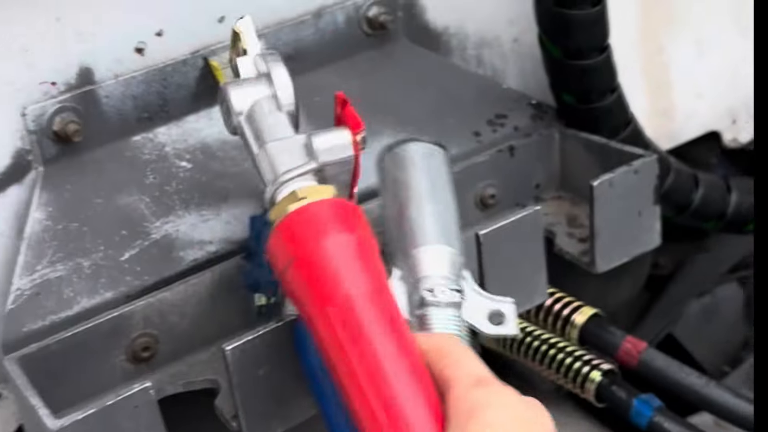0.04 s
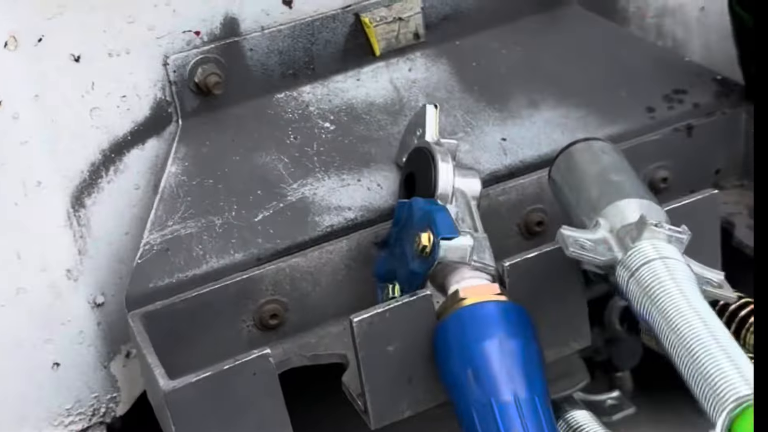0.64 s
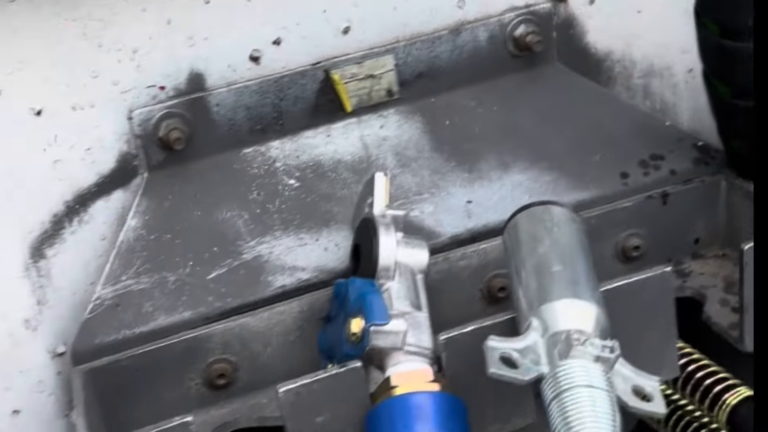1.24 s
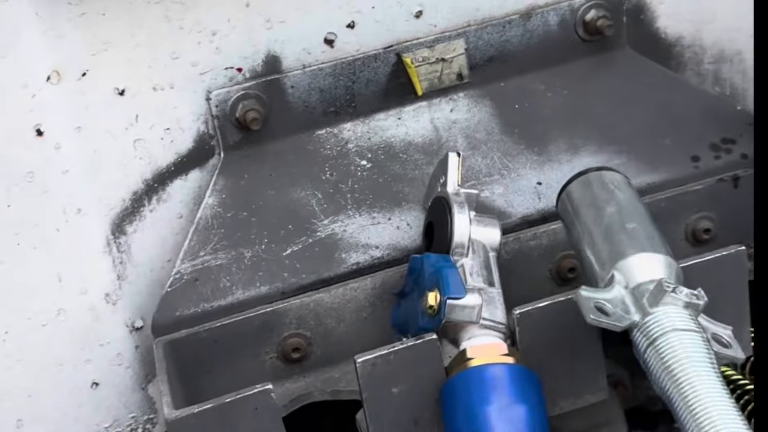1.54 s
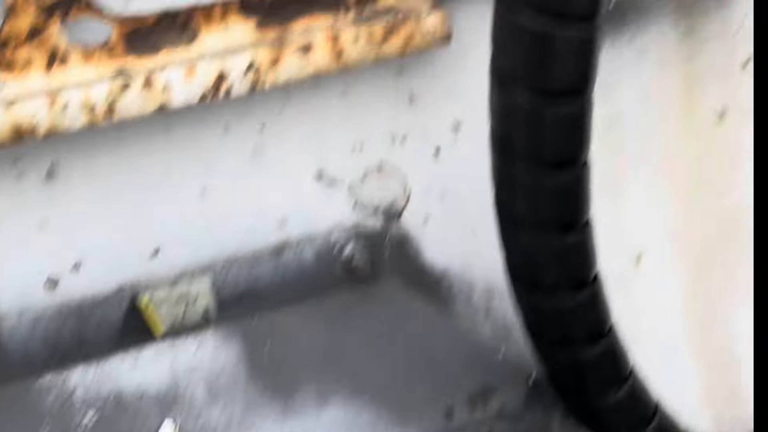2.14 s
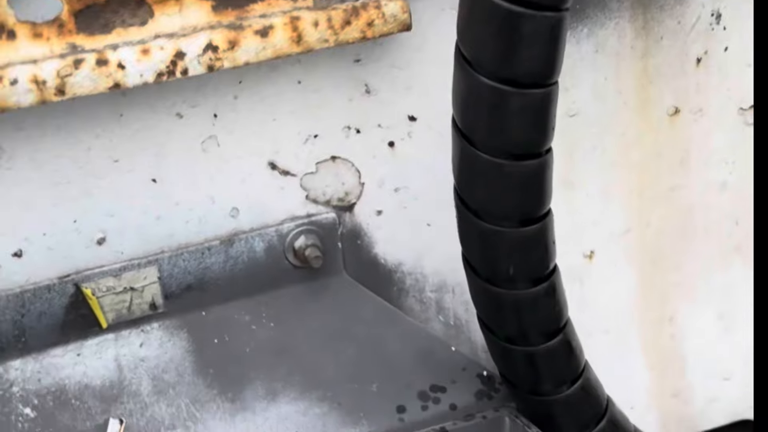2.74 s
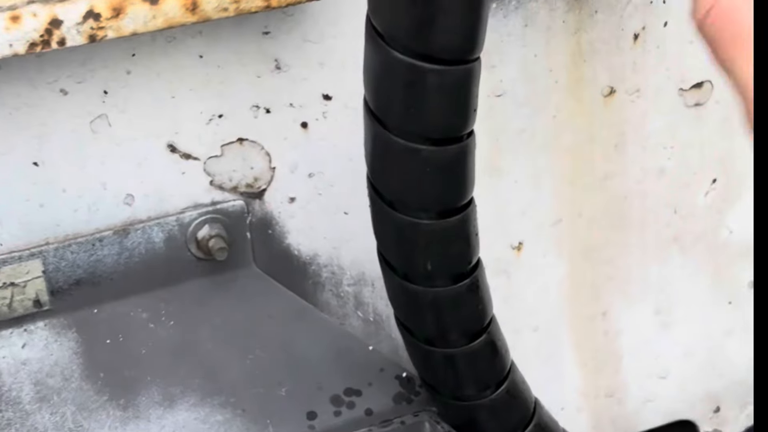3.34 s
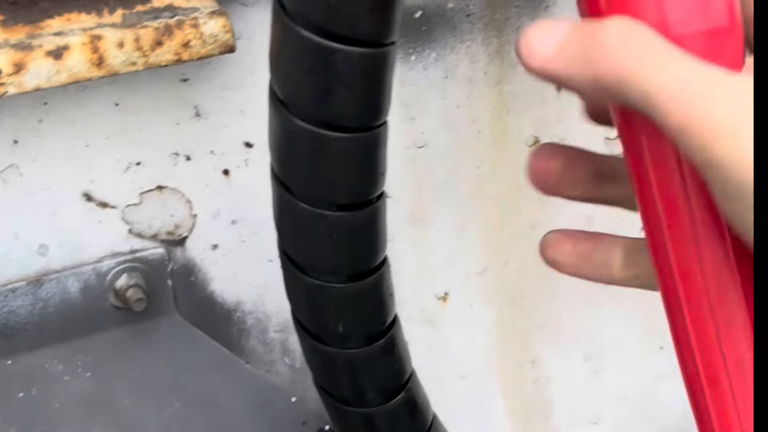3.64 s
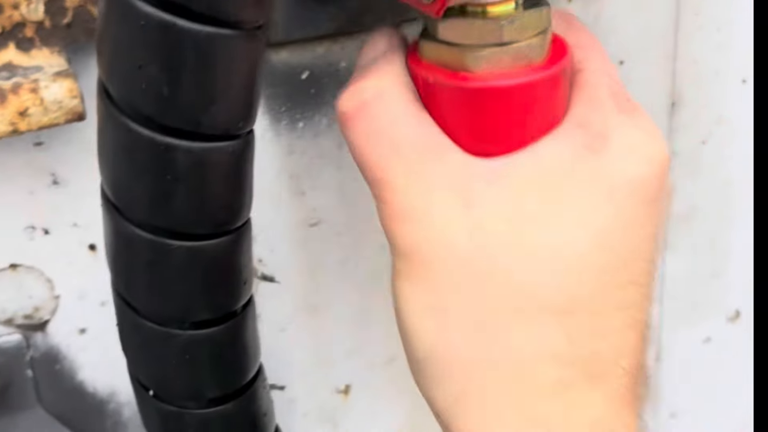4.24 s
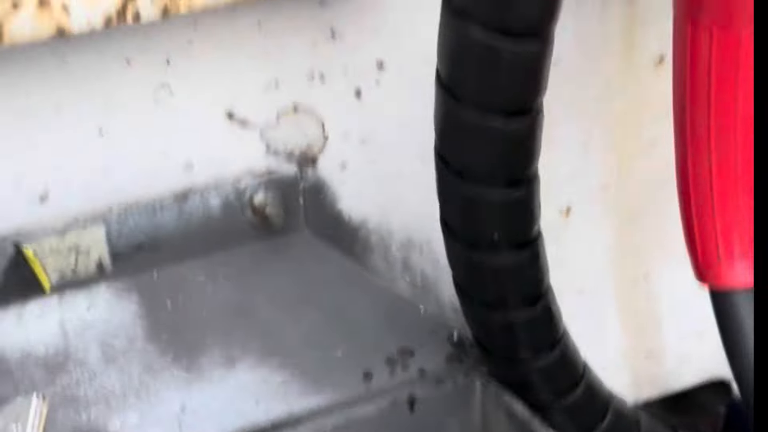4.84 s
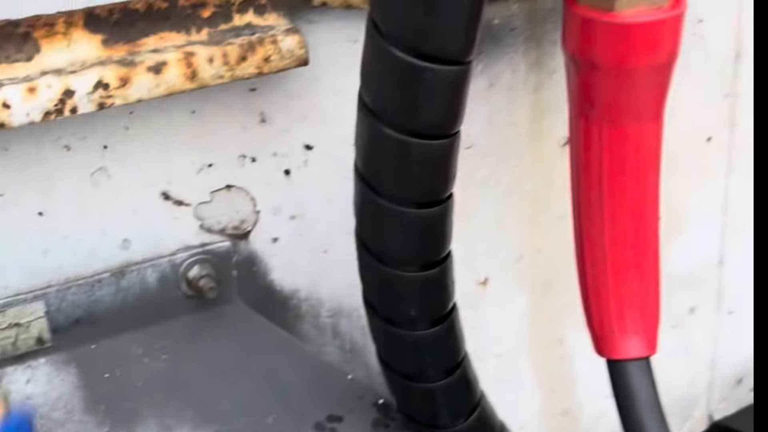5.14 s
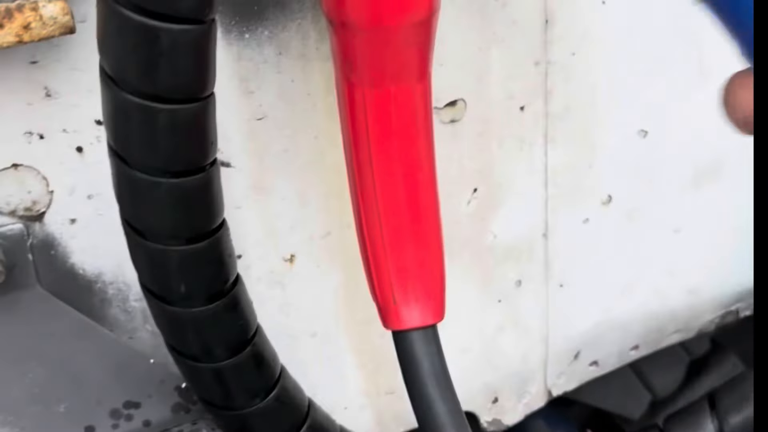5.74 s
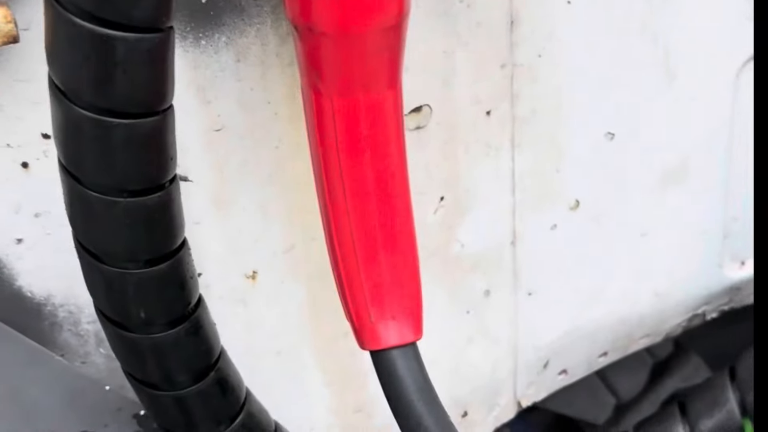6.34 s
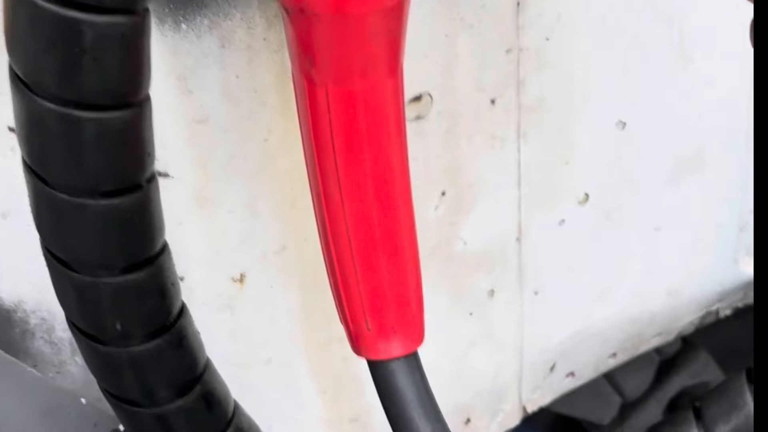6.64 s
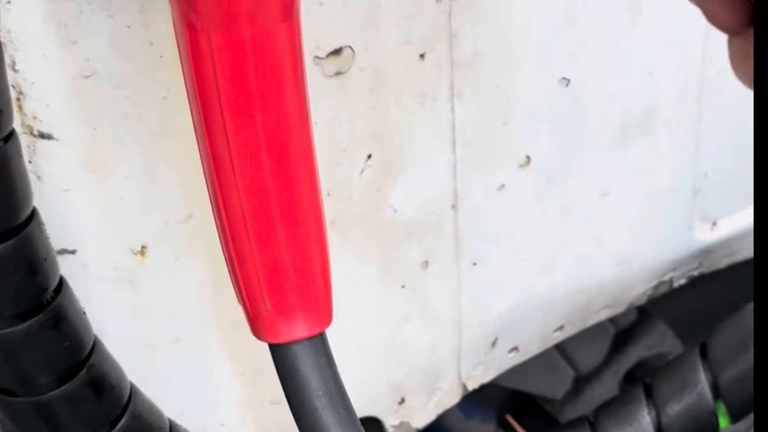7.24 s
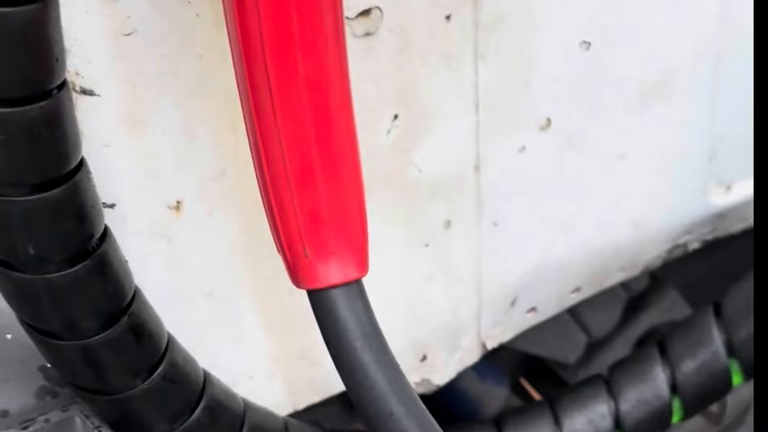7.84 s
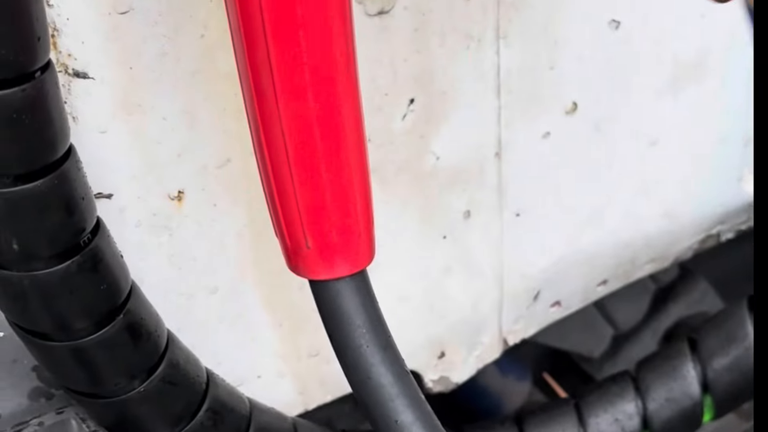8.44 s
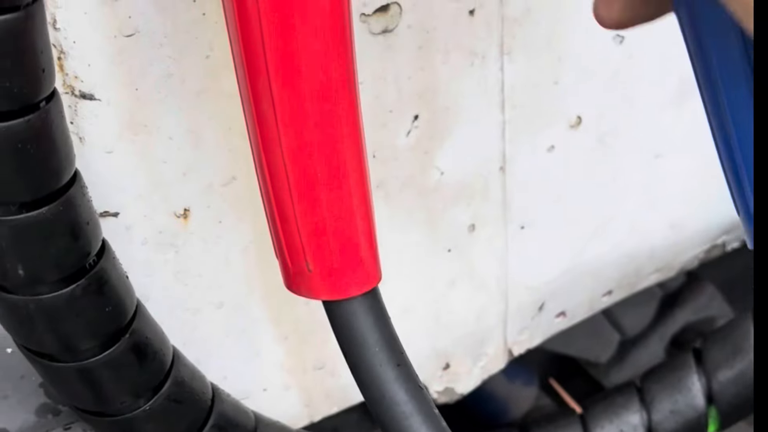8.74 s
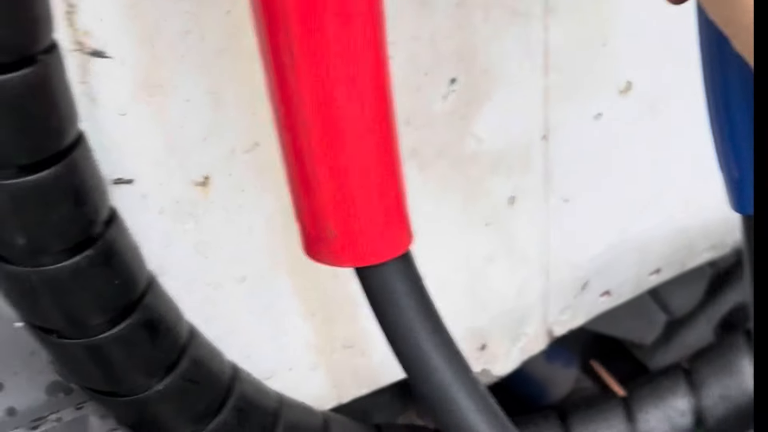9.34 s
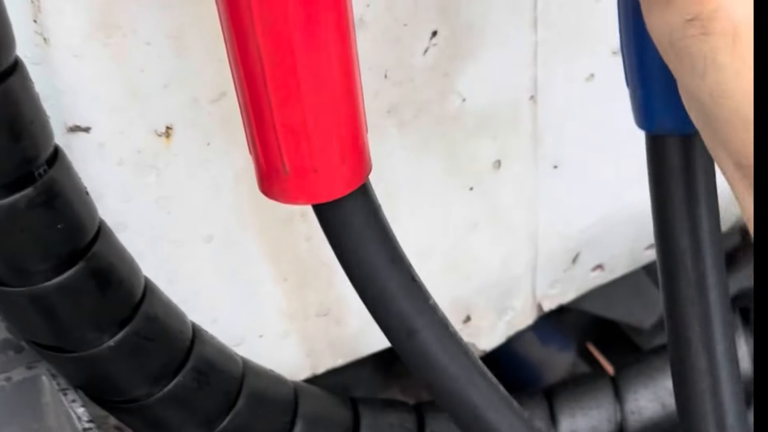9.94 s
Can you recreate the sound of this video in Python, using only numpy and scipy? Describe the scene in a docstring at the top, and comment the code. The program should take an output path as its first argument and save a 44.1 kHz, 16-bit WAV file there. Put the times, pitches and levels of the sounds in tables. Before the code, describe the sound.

Air hose couplings are handled close up behind a truck's cab, over the steady low drone of a distant idling engine. In the first half second, the metal heads come off a steel bracket with three sharp, briefly ringing clanks. Soft bumps and a small scrape follow. Around 2.3 seconds comes a loud cluster of knocks that thump through sheet steel, then two hollow ringing hits by 2.8. Short scrapes and more knocks run from 3.3 to 4.3 seconds. At 5 seconds there are low thuds with a faint springy ring, and firm clanks land at about 5.8 and 6. From 6.4 to 8.4 seconds, lighter knocks, ticks and scrapes come in a busy, uneven run. Strong hollow knocks fall at about 9, 9.3 and 9.8 seconds. Between the blows, hoses rub softly and sleeves rustle with a faint dry crackle.

```python
"""Behind a truck's cab, close up: air hose couplings are lifted off a steel bracket and hung up.
Their metal heads clank, knock and scrape; each blow thumps through the sheet steel, and the cleanest
leave parts ringing. Blows are noise bursts coloured by the steel, rings are decaying sines, and scrapes
are noise roughened by tiny slips. Hoses rub and sleeves rustle in between, over a low engine idle."""
import sys
import numpy as np
from scipy import signal
from scipy.fft import rfft, irfft, next_fast_len
from scipy.io import wavfile
from scipy.ndimage import uniform_filter1d, map_coordinates

SR = 44100
rng = np.random.default_rng(int(sys.argv[2]) if len(sys.argv) > 2 else 0)


def dump(signal):
    """Clip the signal to [-1, 1] and save it as 16-bit WAV at the path in sys.argv[1]."""
    limited = np.clip(np.atleast_2d(signal).T, -1, 1)
    pcm = np.round(limited * 32767).astype(np.int16)
    wavfile.write(sys.argv[1], SR, pcm)


N = 440118
BLOW_SAMPLES = 10240
GRAZE_S = 0.014  # the metal grazes its seat this long before it strikes home

# tone of a metal contact, with the recorder's notch near 12 kHz: (frequency [Hz], level [dB])
CONTACT_EQ = [(60, -2.5), (150, 6), (450, 3), (1200, 1), (2000, -7), (3000, -13.5), (4200, -21),
              (7000, -20), (9500, -29.5), (12000, -55), (15500, -27.5)]
# tone of rubbing hose and coupling body: (frequency [Hz], level [dB])
RUB_EQ = [(70, -20), (200, 2.5), (450, 6), (850, -1.5), (1500, -14), (2300, -14), (4000, -27), (9000, -61)]


def knocks():
    """Each contact ticks and clanks in the coupling head, knocks the bracket and thumps the panel."""
    hz = np.fft.rfftfreq(BLOW_SAMPLES, 1 / SR)
    body = steel(hz) * amp(along(CONTACT_EQ, hz))
    panel = causal(body * band(hz, 43, 136.6))
    plate = causal(body * band(hz, 169, 1092))
    casting = causal(body * band(hz, 1320, 3080, order=6))
    edge = causal(body * band(hz, 3900, 15000))
    track = np.zeros((2, N))
    for s, thump_db, knock_db, knock_hz, clank_db, clank_hz, tick_db, sustain in contacts():
        spot = amp(contact_point(depth_db=5.5) * band(hz, 700, SR, order=1))
        # bracket and head each get a broad hump with one mode standing out
        bracket = plate * spot * resonance(hz, knock_hz, q=0.74)
        bracket *= 1 + 1.5 * resonance(hz, knock_hz, q=21.3)
        head = casting * spot * resonance(hz, clank_hz, q=0.17)
        head *= 1 + 1.02 * resonance(hz, clank_hz, q=14.5)
        cutoff_hz = 3940 * amp(0.58 * (clank_db - knock_db))  # a cushioned blow is duller
        bracket *= band(hz, 1, cutoff_hz, order=3)
        rise_s = 0.00066 * (0.5 + np.clip((-11.5 - knock_db) / 7, 0, 3))  # gentle blows bite slowly
        thump = burst(panel, rise_s=0.0021, t60=0.1,
                      tail_db=-12.5, tail_t60=0.36, graze_db=-14.5, side_db=-39)
        knock = burst(bracket, rise_s, t60=0.12 * sustain,
                      tail_db=-24.5, tail_t60=0.38, graze_db=-16, side_db=-16.5)
        clank = burst(head, rise_s, t60=0.068 * sustain,
                      tail_db=-14, tail_t60=0.16, graze_db=-13, side_db=-16)
        tick = burst(edge * spot, rise_s=0.00033, t60=0.033,
                     tail_db=-13, tail_t60=0.17, graze_db=-33, side_db=-4.5)
        lows = amp(thump_db - 1.5) * thump + amp(knock_db + 0.59) * knock
        highs = amp(clank_db + 0.3) * clank + amp(tick_db) * tick
        add(track, s - GRAZE_S, lows + highs)
    return track


def contacts():
    """Time, levels and tuning of every blow and, unless it is held fast, of its lower, duller rebound."""
    # coupling blows; weight (thump), hardness (clank) and rebound are relative to the level:
    # (time [s], level [dB], pitch [Hz], weight [dB], hardness [dB], rebound [dB])
    blows = [(0.002, -30, 507, 13, -10.5, -1.5), (0.081, -17, 865, -2, -6, -6),
             (0.138, -35.5, 513, 16.5, -4, -22), (0.166, -17, 718, -1, -2.5, -9),
             (0.473, -19.5, 1110, -21, -7.5, -19), (0.753, -33, 390, 7.5, -14.5, -46),
             (0.784, -32.5, 770, 2, -19, -18), (1.099, -37.5, 246, -2, -25, -24),
             (1.156, -33.5, 284, -1, -15, -13), (1.454, -42.5, 405, 2, 1.5, 2),
             (1.694, -41, 233, -3, -6.5, -28), (1.99, -42, 484, -11, -11.5, 0.5),
             (2.272, -22, 407, -30, -7.5, -2), (2.297, -23, 476, -10, -11, -4.5),
             (2.313, -13, 258, -4.5, -16.5, -18), (2.331, -17, 557, -11, -20.5, -24.5),
             (2.467, -22, 670, -10, -16, -0.5), (2.768, -20.5, 332, -10, -12, -4.5),
             (2.976, -31.5, 454, -3, -26, -31.5), (3.326, -25.5, 460, -5, -16, -4.5),
             (3.361, -20, 517, -3, -12.5, -13.5), (3.4, -28, 430, 0, -12, -7),
             (3.48, -27.5, 850, -11, -20, -39), (3.865, -47.5, 506, -21, 4, -18),
             (3.992, -25, 217, -10, -21, -4.5), (4.242, -18.5, 550, -16, -21.5, -9.5),
             (4.269, -20, 227, -29, -22.5, -15), (4.903, -36.5, 438, 10.5, -15, -18),
             (4.95, -37.5, 457, 10, -25, -22), (4.984, -34, 640, 15.5, -9.5, -11),
             (5.004, -31.5, 950, 5, -6, -12), (5.441, -54.5, 690, -10, -1, -25),
             (5.786, -18.5, 1007, -4, -2.5, -18.5), (5.802, -18, 268, -8.5, -15, -16.5),
             (6.049, -17, 757, -26, -14.5, -19), (6.176, -35.5, 457, -25, -17, -14),
             (6.339, -30, 620, -25, -16, -19), (6.458, -25, 488, -6.5, -20, -13.5),
             (6.535, -39, 630, -1, -12, -17), (6.646, -30.5, 607, -6, -22, -2),
             (6.675, -31.5, 406, 6.5, -27, -18), (6.728, -32, 660, -2.5, -11.5, -19),
             (6.826, -28, 308, -24, -13, -5.5), (6.845, -30.5, 706, -14, -20, -19),
             (6.906, -25.5, 645, -21, -22, -17), (7.136, -20.5, 410, -5, -10, -7.5),
             (7.305, -35.5, 450, -2, -20, -4), (7.41, -32.5, 497, -11, -17.5, -29),
             (7.483, -24.5, 387, -2.5, -11, -9.5), (7.536, -23, 447, 1, -10.5, -5.5),
             (7.626, -32, 484, -6, -16, -6.5), (7.914, -31, 620, -5.5, -18.5, -10),
             (8.017, -27, 485, -17, -8.5, -13.5), (8.059, -21.5, 663, -5, -13, -5.5),
             (8.268, -32.5, 477, -10, -8, -0.5), (9.038, -13, 388, -12, -10.5, -10.5),
             (9.293, -15, 410, -7, -8, -3), (9.54, -30.5, 460, -10, -25.5, -19),
             (9.653, -23.5, 422, -2.5, -30, -12), (9.786, -17.5, 478, -3, -31.5, -11)]
    for s, db, pitch_hz, weight_db, hard_db, rebound_db in blows:
        freedom = amp(0.28 * (rebound_db + 6.5))  # a hand that stops the rebound also damps the ring
        landings = [(s, db, pitch_hz, 0)]
        if rebound_db >= -17.5:
            landings.append((s + 0.021, db + rebound_db, 0.75 * pitch_hz, -5))
        for when, knock_db, knock_hz, bright_db in landings:
            pitch_ratio = knock_hz / 500  # a higher knock clanks higher and dies sooner
            clank_hz = 1766 * pitch_ratio ** 0.4 * np.exp(0.077 * rng.standard_normal())
            sustain = 0.94 * freedom / pitch_ratio ** 0.1
            clank_db = knock_db + hard_db + bright_db
            tick_db = knock_db - 27.5 + bright_db
            yield when, knock_db + weight_db, knock_db, knock_hz, clank_db, clank_hz, tick_db, sustain


def burst(response, rise_s, t60, tail_db, tail_t60, graze_db, side_db):
    """Dense vibration of a blow: graze, quick decay and faint tail; rms 1 over the 30 ms after impact."""
    t = np.arange(BLOW_SAMPLES) / SR - GRAZE_S
    after = np.maximum(t, 0)
    attack = 1 - np.exp(-(after / rise_s) ** 2)
    decay = amp(-60 * after / t60) + amp(tail_db - 60 * after / tail_t60)
    graze = amp(graze_db) * np.exp(-np.abs(t) / 0.0039)
    noise = stereo_noise(BLOW_SAMPLES, side_db) * (attack * decay + graze)
    hit = irfft(rfft(noise) * response)
    return hit / np.sqrt(np.mean(hit[:, (t > 0) & (t < 0.03)] ** 2))


def steel(hz):
    """Gain of the resonances of bracket, panel and coupling heads."""
    # steelwork modes: (centre [Hz], width [Hz], height [dB])
    modes = [(104.5, 10.1, 16), (231, 19, 7.5), (327.5, 4.6, 4.5), (437.6, 12, 8), (680, 6.6, 0),
             (828, 4.7, 0.5), (1037, 47, 6.5), (1234, 9.5, 4), (1338, 11.5, 5), (1538, 51, 0),
             (2170, 76, 8), (2510, 30, 6), (3800, 200, -2), (5500, 23, -1.5), (5710, 90, 6.5),
             (7040, 80, 4.5), (9940, 340, 9)]
    peaks = sum(amp(db) ** 2 / (1 + (2 * (hz - centre) / width) ** 2) for centre, width, db in modes)
    return np.sqrt(1 + peaks)


def contact_point(depth_db):
    """Each spot on the metal favours its own modes: a random comb of peaks and dips."""
    t = np.arange(BLOW_SAMPLES) / SR
    echoes = rng.standard_normal(BLOW_SAMPLES) * t * np.exp(-t / 0.0018)
    return rfft(echoes / np.linalg.norm(echoes)) * depth_db


def ringing():
    """Parts that ring on after a clean blow: coupling head, cable plug, hanger (and the blue coupling as it
    seats, ringing with the same modes) and a small sprung part."""
    # modes of each part: (pitch [Hz], level [dB], t60 [s])
    head_modes = [(827, -20, 0.13), (1410, -20, 0.03), (2170, -37.5, .09), (2750, -19, 0.056),
                  (4850, -24.5, 0.05), (5420, -27, 0.057), (6040, -24.5, 0.044), (7070, -35, .06),
                  (9900, -23.5, 0.042)]
    plug_modes = [(1094, -9, 0.056), (1290, -12, 0.086), (1490, -23, 0.053), (3050, -17, 0.036),
                  (3400, -19.5, 0.054), (3890, -22, 0.046)]
    hanger_modes = [(445.6, 2, .15), (544, -5, .1), (632, -2, .12), (810, -6.5, 0.24), (1069, -5, 0.079),
                    (1345, 3.5, 0.1)]
    spring_modes = [(417, -19, 0.13), (542, -23.5, 0.57), (1170, -17, 0.12), (1310, -14, 0.065),
                    (3220, -36, 0.059)]
    # the cast head is knocked as it pulls free: (time [s], level [dB])
    head_blows = [(.082, 4.5), (0.17, 3)]
    # blows that ring the hollow hanger's modes: on the hanger itself, and from 9 s the blue coupling seating
    # home: (time [s], level [dB], pitch the struck spot favours [Hz])
    hollow_blows = [(2.468, -6.5, 650), (2.769, -11, 575), (5.787, -14.5, 1450), (6.05, -11, 770),
                    (7.135, -24.5, 500), (9.04, -17.5, 385), (9.293, -10.5, 498), (9.788, -9.5, 453)]
    reach_octaves = 0.46
    track = np.zeros((2, N))
    for s, db in head_blows:
        add(track, s, amp(db) * free_ring(head_modes, attack_s=0.00038))
    add(track, 0.4745, free_ring(plug_modes, attack_s=0.0006))
    for s, db, spot_hz in hollow_blows:
        excited = [(hz, level - 10 / np.log(10) * (np.log2(hz / spot_hz) / reach_octaves) ** 2, t60)
                   for hz, level, t60 in hanger_modes]
        add(track, s, amp(db) * free_ring(excited, attack_s=0.0015))
    add(track, 5.004, free_ring(spring_modes, attack_s=0.00098))
    return track


def free_ring(modes, attack_s):
    """The modes of a struck part, each slightly unsteady and excited differently by every blow."""
    t = np.arange(SR // 2) / SR
    phases = [2 * np.pi * (hz * t + rng.random()) + 0.2 * wobble(90, len(t)) for hz, _, _ in modes]
    tone = sum(amp(db + rng.normal() - 60 * t / t60) * np.sin(phase)
               for (_, db, t60), phase in zip(modes, phases))
    return tone * (1 - np.exp(-t / attack_s))


def ticks():
    """A sharp edge catches: a flick of bright crackle that leaves the panel still."""
    # metal edges catching: (time [s], level [dB])
    catches = [(0.081, -25), (0.167, -23), (0.4742, -36), (2.141, -54), (2.466, -25.5), (2.767, -34),
               (3.398, -44.5), (3.513, -51.5), (3.324, -41), (3.964, -42), (4.269, -43), (5.102, -49.5),
               (5.28, -48.5), (6.797, -51.5), (6.826, -44), (7.136, -42.5), (7.244, -55), (7.343, -50),
               (7.41, -40.5), (7.534, -45), (8.059, -32.5), (8.084, -41), (8.111, -46.5), (8.189, -51.5),
               (8.497, -48.5), (8.942, -46), (9.037, -44), (9.291, -34.5), (9.327, -42), (9.949, -53)]
    hz = np.fft.rfftfreq(BLOW_SAMPLES, 1 / SR)
    edge = causal(steel(hz) * amp(along(CONTACT_EQ, hz)) * band(hz, 3350, 15000))
    track = np.zeros((2, N))
    for s, db in catches:
        spot = amp(contact_point(depth_db=5.5))
        tick = burst(edge * spot, rise_s=0.00079, t60=0.02,
                     tail_db=-21, tail_t60=0.12, graze_db=-35.5, side_db=-7)
        add(track, s - GRAZE_S, amp(db + 0.7) * tick)
    return track


def scrapes():
    """Dragged metal rubs and grates, each spot in its own resonance; a brushing hand only hisses."""
    # metal dragged over the bracket: (start [s], length [s], level [dB], rise [s], resonance [Hz])
    drags = [(0.021, 0.021, -38, 0.006, 820), (0.098, 0.032, -30, 0.0094, 816),
             (1.444, 0.086, -33.5, 0.01, 1230), (2.256, 0.048, -22.5, 0.015, 256),
             (2.67, 0.091, -36, 0.016, 624), (2.936, 0.028, -25.5, 0.014, 473),
             (3.305, 0.11, -28, 0.015, 880), (3.808, 0.21, -46.5, 0.019, 700),
             (3.926, 0.099, -28.5, 0.038, 706), (4.217, 0.12, -41.5, 0.0071, 345),
             (4.969, 0.047, -30, 0.015, 1320), (6.869, 0.14, -43, 0.028, 453),
             (7.284, 0.18, -48.5, 0.0095, 660), (7.514, 0.16, -43.5, 0.0049, 466),
             (8.078, 0.027, -30.5, 0.0036, 910), (8.251, 0.032, -30.5, 0.0096, 930),
             (8.404, 0.14, -40, 0.018, 880), (8.91, .037, -42.5, 0.0048, 436),
             (9.149, 0.06, -43.5, 0.0075, 450)]
    # a hand brushing a sleeve: (start [s], length [s], level [dB])
    brushes = [(0.592, 0.027, -44.5), (1.145, 0.14, -52), (1.736, 0.014, -36.5), (2.822, 0.027, -41.5),
               (3.484, 0.037, -40), (4.419, 0.054, -52), (4.759, 0.013, -40.5), (5.005, 0.03, -46),
               (5.275, 0.039, -38.5), (5.668, 0.11, -47), (5.83, 0.047, -42.5), (6.374, 0.031, -45),
               (6.447, 0.015, -41.5), (7.761, 0.014, -48.5), (7.976, 0.058, -47), (8.936, 0.025, -40),
               (9.567, 0.026, -47), (9.815, 0.027, -41.5)]
    # tone of sliding grit, with the recorder's notch near 12 kHz: (frequency [Hz], level [dB])
    grit_eq = [(600, -26.5), (1500, -6.5), (2300, 3), (4200, -1), (5800, 4), (7500, 7), (9500, 1),
               (12000, -26.5), (15500, -3)]
    rubbing = friction(RUB_EQ, slip_rate=300, slip_db=0.5, metal=0.72, patchy_db=5.5, side_db=-14.5)
    rub, grit_gain = np.zeros((2, N)), np.zeros((1, N))
    for start, length, rub_db, rise_s, peak_hz in drags:
        envelope = stroke(length, rise_s)
        slide = envelope * rubbing[:, round(start * SR):][:, :len(envelope)]
        slide = filtered(slide, lambda hz: 1 + amp(4) * resonance(hz, peak_hz, q=3.7))
        add(rub, start, amp(rub_db + 4) * slide)
        # quicker drags and harder pressure are grittier
        grit_db = -44 - 2 * np.log2(length / 0.11) + 0.58 * (rub_db + 29.5)
        add(grit_gain, start, amp(grit_db) * envelope)
    for start, length, db in brushes:
        add(grit_gain, start, amp(db) * stroke(length, rise_s=0.093 * length))
    grating = friction(grit_eq, slip_rate=1300, slip_db=1.5, metal=0.22, patchy_db=3.5, side_db=-8)
    return rub + grit_gain * snags() * grating


def stroke(length, rise_s):
    """Envelope of one slide: it builds up, eases off as it grates along and dies away."""
    t = np.arange(SR // 2) / SR
    attack = 1 - np.exp(-(t / rise_s) ** 2)
    easing = amp(-4 * np.minimum(t / length, 1))
    release = np.exp(-np.maximum(t - length, 0) / 0.02)
    return attack * easing * release


def friction(eq, slip_rate, slip_db, metal, patchy_db, side_db):
    """Tiny irregular slips shake the steelwork, their colour shifting as the contact moves; rms 1."""
    slips = stereo_noise(N, side_db) * amp(slip_db * wobble(slip_rate))
    spectra = signal.stft(slips, nperseg=512)[2]
    patches = uniform_filter1d(rng.standard_normal(spectra.shape[1:]), size=4, axis=0)  # across pitch
    patches = uniform_filter1d(patches, size=14, axis=1)  # across time
    slips = signal.istft(spectra * amp(patchy_db * unit(patches)), nperseg=512)[1][:, :N]
    return unit(filtered(slips, lambda hz: amp(along(eq, hz)) * steel(hz) ** metal))


def snags():
    """Gain of a sliding contact that catches now and then."""
    return bumps(rate=32, height_db=3.5, decay_s=0.0033)


def squeaks():
    """A rubber fitting slips for a moment and rasps in one resonance."""
    # rubber slips: (time [s], level [dB])
    slips = [(2.616, -42), (2.672, -42.5), (2.715, -43), (7.038, -45.5)]
    t = np.arange(N) / SR
    envelope = sum(amp(db) * np.exp(-((t - s) / 0.0071) ** 2) for s, db in slips)
    rasp = filtered(rng.standard_normal(N), lambda hz: resonance(hz, 2180, q=6.8) ** 2)
    return envelope * unit(rasp)


def grip():
    """Skin sliding down the ribbed plastic grip snags and hisses in two resonances."""
    # hand slides: (middle [s], half length [s], level [dB])
    slides = [(4.608, 0.047, -47.5), (5.123, 0.064, -50)]
    # resonances of the grip: (centre [Hz], Q, level [dB])
    modes = [(3270, 8, -0.5), (5800, 12, 2)]
    t = np.arange(N) / SR
    envelope = sum(amp(db) * np.exp(-((t - s) / half_s) ** 2) for s, half_s, db in slides) * snags()
    hiss = filtered(stereo_noise(N, side_db=-23.5),
                    lambda hz: sum(amp(db) * resonance(hz, centre, q) for centre, q, db in modes))
    return envelope * unit(hiss)


def handling():
    """As the hands move, hoses rub with jostling fittings and sleeves rustle with a dry crackle."""
    # fader rides of hoses and sleeves: (time [s], level [dB])
    hose_ride = [(0.26, -45), (1.23, -55), (1.91, -48), (2.67, -41), (2.99, -48), (4.1, -49), (5.19, -50),
                 (5.7, -52), (6.29, -53.5), (6.42, -44), (6.78, -46.5), (7.16, -47), (7.52, -44),
                 (7.68, -51.5), (7.95, -51), (8.16, -37.5), (8.73, -50.5), (9.98, -46)]
    sleeve_ride = [(0.1, -50.5), (0.33, -65), (0.62, -53.5), (0.88, -56.5), (1.219, -53.5), (1.38, -68.5),
                   (1.8, -57), (2.15, -57), (3.15, -63.5), (3.5, -44.5), (3.62, -57.5), (3.78, -62.5),
                   (3.93, -51), (4.15, -61.5), (4.35, -50.5), (5.17, -52), (5.23, -58.5), (5.55, -59),
                   (6.29, -66), (6.85, -54.5), (7.1, -62.5), (7.45, -49), (7.85, -70), (8.15, -61.5),
                   (8.55, -58.5), (9.1, -60), (9.43, -63), (9.7, -58.5)]
    # tone of rustling sleeves, with the recorder's notch near 12 kHz: (frequency [Hz], level [dB])
    sleeve_eq = [(900, 4), (2200, 2.5), (3300, 2), (4600, -1.5), (5800, 0.5), (7300, 1), (9500, -3.5),
                 (12000, -22.5), (15500, -7)]
    t = np.arange(N) / SR
    motion = wobble(22)  # one gesture swells both layers
    hoses = friction(RUB_EQ, slip_rate=97, slip_db=2, metal=0.12, patchy_db=3, side_db=-10)
    hoses *= amp(np.interp(t, *np.transpose(hose_ride)) - 3 + 2 * motion)
    sleeves = friction(sleeve_eq, slip_rate=1400, slip_db=2, metal=0.11, patchy_db=3.5, side_db=-7.5)
    sleeves *= amp(np.interp(t, *np.transpose(sleeve_ride)) + 2.3 * motion)
    jostle = bumps(rate=11, height_db=2, decay_s=0.011)
    crackle = bumps(rate=40, height_db=3, decay_s=0.0016)
    return hoses * jostle + sleeves * crackle


def engine():
    """A distant idle: a low drone with two slightly unsteady hum tones."""
    # tone of the drone: (frequency [Hz], level [dB])
    drone_eq = [(15, -37.5), (30, -16.5), (45, 0), (62, 2.5), (85, -2), (125, -3.5), (180, -8), (263, -16),
                (500, -34), (1200, -37.5), (4000, -63)]
    # hum tones: (pitch [Hz], level [dB])
    tones = [(59.2, -43.5), (134.6, -50)]
    drone = unit(filtered(stereo_noise(N, side_db=-61), lambda hz: amp(along(drone_eq, hz))))
    hum = np.zeros(N)
    for hz, db in tones:
        gain = np.sqrt(2) * amp(db + 3.3 * wobble(3.03))
        pitch_hz = hz * (1 + 0.01462 * wobble(4))
        hum += gain * np.sin(2 * np.pi * np.cumsum(pitch_hz) / SR)
    return amp(-39.5) * drone + hum


def amp(db):
    """Decibels to gain."""
    return np.exp(np.asarray(db) * (np.log(10) / 20))


def unit(x):
    """Scale to rms 1."""
    return x / np.sqrt(np.mean(x ** 2) + 1e-20)


def along(points, hz):
    """(Hz, value) points joined on a log axis."""
    knots_hz, values = np.transpose(points)
    return np.interp(np.log(hz + 1), np.log(knots_hz + 1), values)


def wobble(rate, size=N):
    """A smooth random curve, rate knots a second."""
    knots = rng.standard_normal(int(size * rate / SR) + 4)
    return map_coordinates(knots, [np.arange(size) * rate / SR])


def bumps(rate, height_db, decay_s):
    """A gain of 1 with short random bumps, about rate a second."""
    age = np.arange(SR // 5) / SR / decay_s
    shape = np.exp(-age) * (1 - np.exp(-4 * age))
    kicks = (rng.random(N) < rate / SR) * rng.exponential(size=N)
    return 1 + amp(height_db) * signal.fftconvolve(kicks, shape)[:N]


def stereo_noise(size, side_db):
    """White noise, mostly shared by both channels; side_db sets the width."""
    mid, side = rng.standard_normal((2, size))
    return np.array([mid + amp(side_db) * side, mid - amp(side_db) * side])


def filtered(x, response):
    """Filter x by a response given as a function of frequency."""
    size = x.shape[-1]
    padded = next_fast_len(size + SR // 10)
    return irfft(rfft(x, padded) * response(np.fft.rfftfreq(padded, 1 / SR)), padded)[..., :size]


def causal(gain):
    """The minimum-phase response with this gain: it rings only after the blow."""
    cepstrum = irfft(np.log(np.maximum(gain, 1e-6)))
    half = len(cepstrum) // 2
    cepstrum[1:half] *= 2
    cepstrum[half + 1:] = 0
    return np.exp(rfft(cepstrum))


def band(hz, low_hz, high_hz, order=4):
    """Gain of a band-pass; order steepens the skirts."""
    return ((1 + (low_hz / (hz + 1)) ** (2 * order)) * (1 + (hz / high_hz) ** (2 * order))) ** -0.5


def resonance(hz, centre_hz, q):
    """Response of one mode, 1 at its centre."""
    return 1j * hz / q / (centre_hz - hz ** 2 / centre_hz + 1j * hz / q)


def add(track, s, sound):
    """Mix a sound into the track at time s."""
    start = round(s * SR)
    sound = sound[..., max(0, -start):]
    part = track[:, max(0, start):][:, :sound.shape[-1]]
    part += sound[..., :part.shape[1]]


def scene():
    """Everything heard beside the truck."""
    return knocks() + ringing() + ticks() + squeaks() + scrapes() + grip() + handling() + engine()


def record(dry):
    """The recorder skews the treble phase between channels, rounds off peaks and cuts above 16 kHz."""
    # phase between the channels: (frequency [Hz], left minus right [rad])
    skew = [(4700, 0), (5600, -.45), (7000, -1.2), (8500, -1.9), (10500, -3.1), (13700, -3.2),
            (15500, -4.1)]
    sides = np.array([[1], [-1]])
    skewed = filtered(dry, lambda hz: np.exp(0.5j * along(skew, hz) * sides))
    rounded = skewed / (1 + np.abs(skewed / 0.95) ** 6) ** (1 / 6)
    return filtered(rounded, lambda hz: hz < 16000)


dry = scene()
out = record(dry)
dump(out)
```